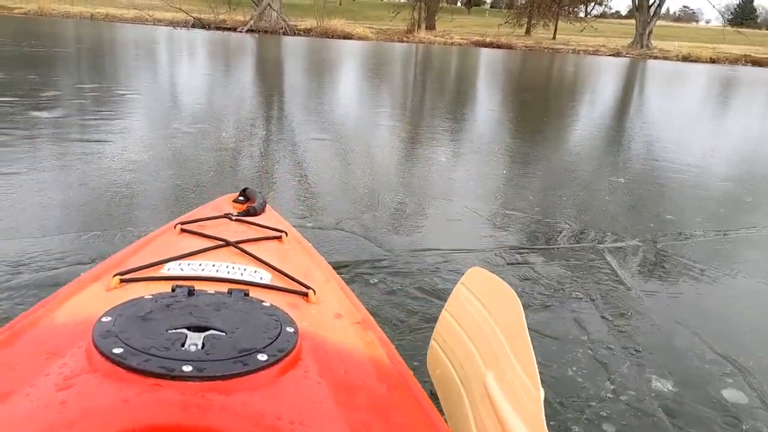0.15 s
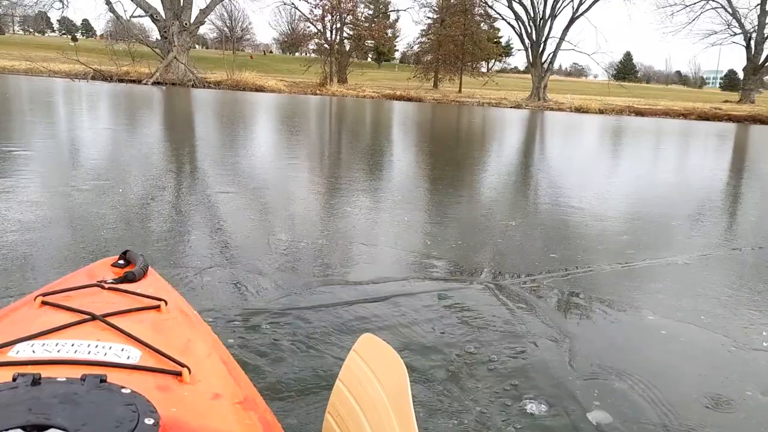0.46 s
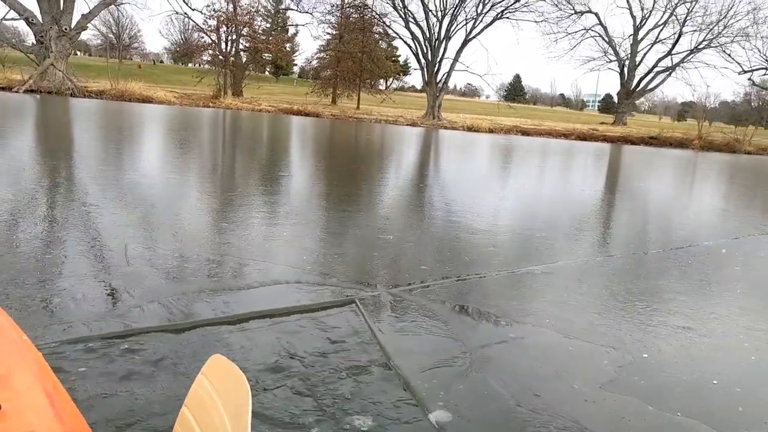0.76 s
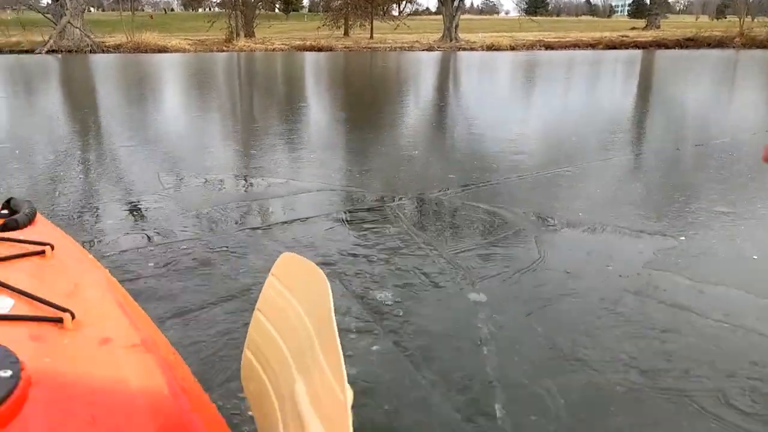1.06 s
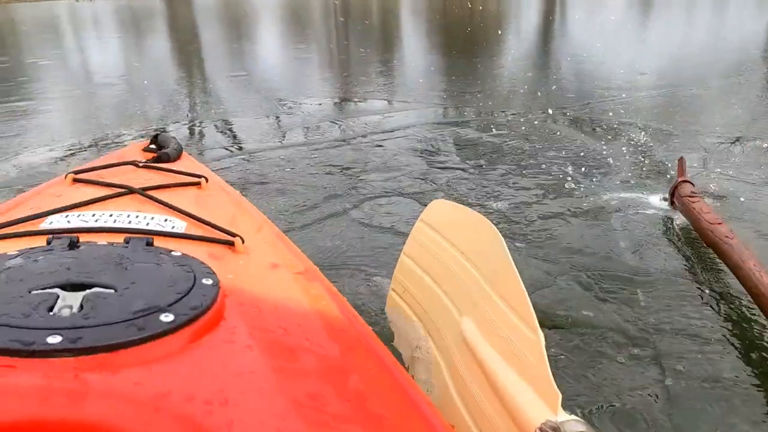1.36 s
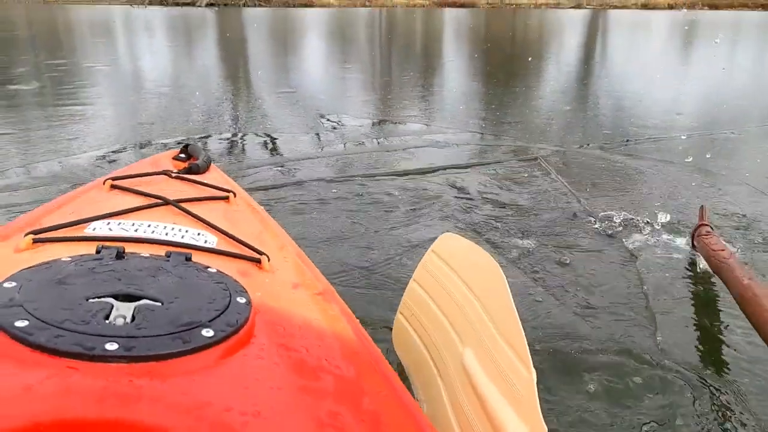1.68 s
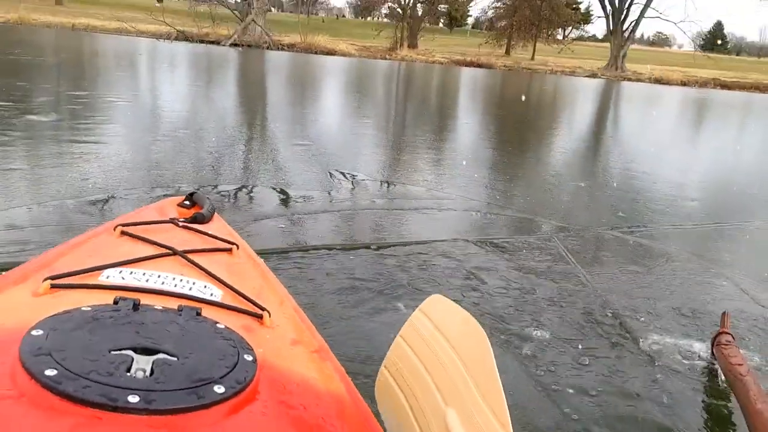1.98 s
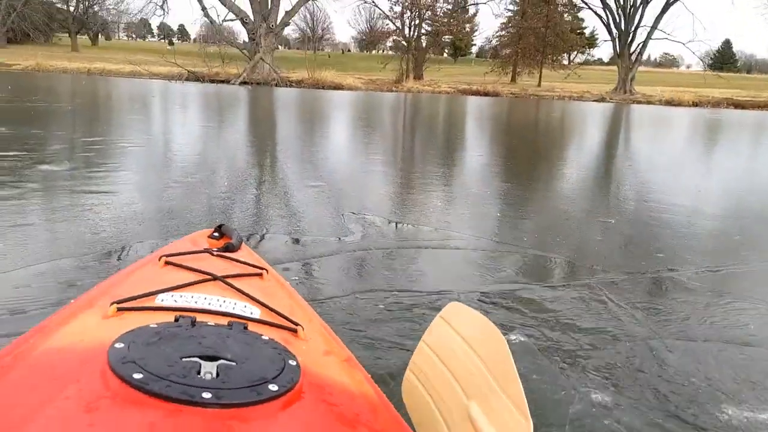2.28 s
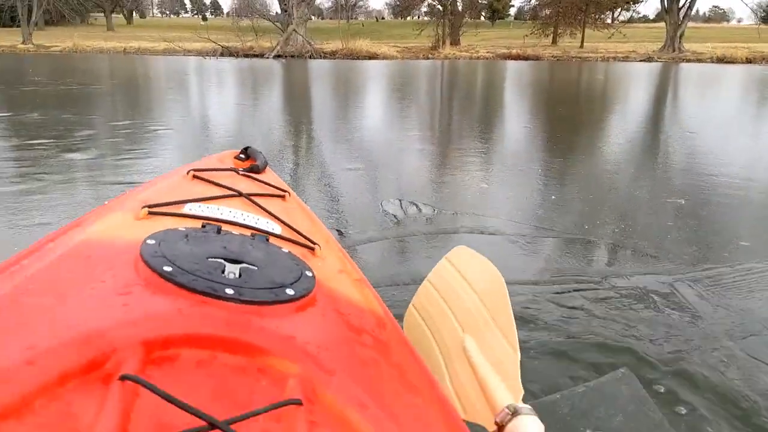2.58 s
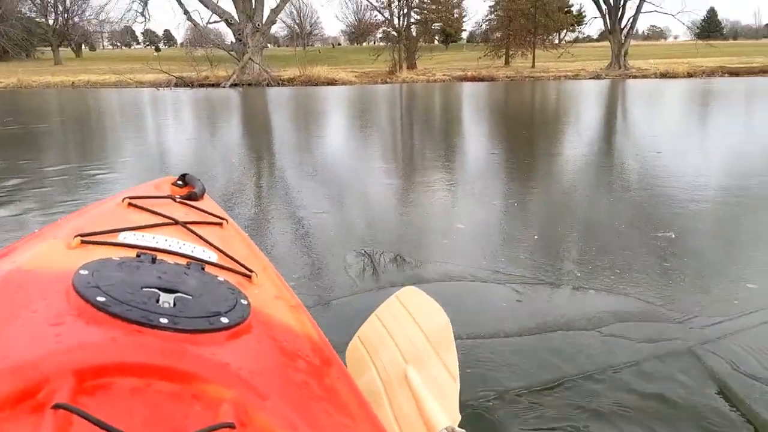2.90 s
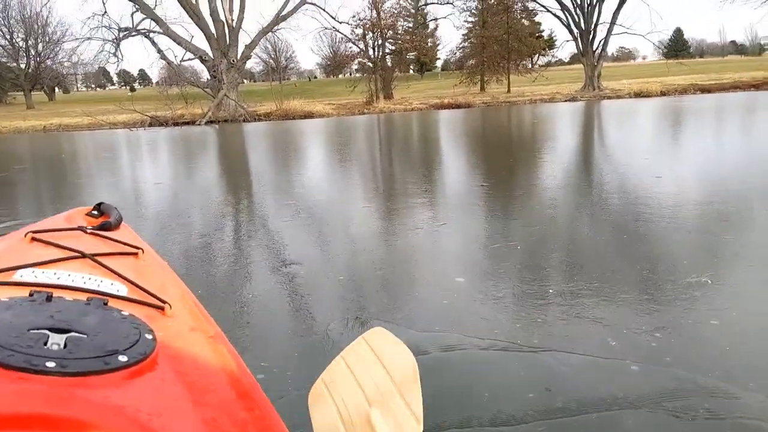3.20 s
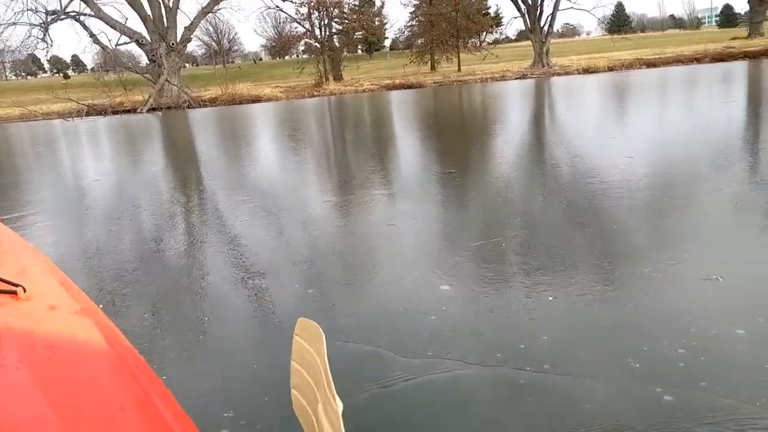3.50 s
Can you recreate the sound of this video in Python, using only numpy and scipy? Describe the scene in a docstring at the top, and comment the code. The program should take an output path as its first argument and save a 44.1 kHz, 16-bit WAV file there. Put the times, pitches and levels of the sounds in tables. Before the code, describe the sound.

Thin ice cracks and grinds against a hollow plastic kayak hull pushing through it.

```python
"""Kayak in thin lake ice

A plastic kayak pushes through the ice, heard from the cockpit. Plates knock and grind on the hollow
hull, and the sheet cracks and crunches at the bow. A pole jabs through with a ping and a small splash.
Trapped air glugs, drops patter, ice edges squeak and loose shards hiss along the sheet.
Behind it all are a soft hiss and light wind rumbling on the microphone."""
import sys
import numpy as np
from scipy import signal
from scipy.fft import rfft, irfft, next_fast_len
from scipy.io import wavfile
from scipy.ndimage import uniform_filter1d

SR = 44100
rng = np.random.default_rng(int(sys.argv[2]) if len(sys.argv) > 2 else 0)


def to_wav(sig):
    """Store sig (one row per channel, or 1-D mono) as 16-bit WAV at the path in sys.argv[1].

    Samples outside -1..1 are clipped; the rate is SR.
    """
    pcm = np.clip(np.atleast_2d(sig), -1, 1) * 32767
    pcm = np.round(pcm).astype(np.int16)
    wavfile.write(sys.argv[1], SR, pcm.T)  # frames by channels


N = 160965
TIME = np.arange(N) / SR  # seconds since the scene began
AGE = TIME[:SR // 2]  # seconds since one short sound began


def amp(db):
    return 10 ** (np.asarray(db) / 20)


def unit(x):
    """Scale a sound to an average power of 1."""
    return x / np.sqrt(np.mean(x ** 2) + 1e-18)


def burst(x, db):
    """Give a short sound as much energy as 20 ms at this level."""
    energy = np.sum(x ** 2) / len(np.atleast_2d(x))
    return x * amp(db) * np.sqrt(SR / 50 / (energy + 1e-18))


def loudness(table, column=1):
    """A volume that glides between a table's levels over time."""
    rows = np.array(table)
    return amp(np.interp(TIME, rows[:, 0], rows[:, column]))


def add(out, start, x):
    i = int(start * SR)
    out[:, i:i + x.shape[-1]] += x[..., :N - i]


def look_up(table, hz):
    rows = np.array(table)
    return np.interp(np.log(hz + 1), np.log(rows[:, 0]), rows[:, 1])


def colour(x, tone, tilt_db=0):
    """Filter a sound by a tone table; a positive tilt makes it brighter."""
    size = 2 * next_fast_len(x.shape[-1] // 2 + 2048)
    hz = np.fft.rfftfreq(size, 1 / SR)
    octaves = np.log2(np.maximum(hz, 500) / 4000)
    gain = amp(look_up(tone, hz) + tilt_db * octaves)
    # These steps keep the filter from ringing before a hit.
    cepstrum = irfft(np.log(gain))
    cepstrum[1:size // 2] *= 2
    cepstrum[size // 2 + 1:] = 0
    return irfft(rfft(x, size) * np.exp(rfft(cepstrum)))[..., :x.shape[-1]]


def band(x, hz, width):
    """Keep the sound around one pitch; width is a multiple of that pitch."""
    edge = width / 2 + np.sqrt(1 + width ** 2 / 4)
    limits = [hz / edge, min(hz * edge, SR / 2.2)]
    return signal.sosfilt(signal.butter(1, limits, "band", fs=SR, output="sos"), x + 1e-18)


def clicks(size, per_s, spread_db):
    """Tiny random impacts of uneven strength."""
    happens = rng.random(size) < per_s / SR
    strength = amp(spread_db * np.clip(rng.standard_normal(size), -2, 2))
    return happens * rng.choice([-1, 1], size) * strength


def die_away(seconds):
    """A fade that drops 60 dB in this time."""
    return np.exp(-np.log(1000) * AGE / seconds)


def ring(notes):
    """The fading notes of a struck object, added together."""
    return sum((-1) ** k * amp(db) * np.sin(2 * np.pi * hz * AGE) * die_away(seconds)
               for k, (hz, db, seconds) in enumerate(notes))


def wash(fade_s, apart_hz=1060):
    """Fading noise, alike on both sides in the bass. A fade time is the time to fall to 37%."""
    shared, side = rng.standard_normal((2, len(AGE)))
    side = signal.sosfilt(signal.butter(2, apart_hz, "high", fs=SR, output="sos"), side)
    x = (shared + side * np.array([[1], [-1]])) * np.exp(-AGE / fade_s)
    return x / np.sqrt(np.sum(x ** 2) / 2)


def through(x, response):
    """Let every part of a sound set off the given ring."""
    return signal.fftconvolve(np.atleast_2d(x), response, axes=1)[:, :x.shape[-1]]


# How the background hiss swells and dips. Each row: time in seconds, level in dB.
HISS_LEVELS = [(0, -44.5), (.25, -45), (.5, -39), (.7, -48.5), (.85, -47.5), (1.0, -40.5), (1.18, -39.5),
               (1.31, -51.5), (1.42, -38), (1.6, -51), (1.9, -41.5), (2.3, -43), (3.0, -42.5), (3.65, -50)]
# The tone of the hiss and of the wind. Each row: frequency in Hz, boost in dB.
HISS_TONE = [(200, 21.5), (600, 16), (1300, 6.5), (2300, 4.5), (4000, 1.5), (5500, 4), (8500, 5),
             (11000, -3.5), (13500, 5), (16000, -14)]
WIND_TONE = [(20, -37), (60, -1), (160, -5), (400, -22), (1500, -48)]


def air():
    """A soft hiss comes and goes while wind rumbles on the microphone."""
    hiss = unit(colour(rng.standard_normal((2, N)), HISS_TONE))
    wind = unit(colour(rng.standard_normal((2, N)), WIND_TONE))
    return hiss * loudness(HISS_LEVELS) + wind * amp(-42)


# Sliding shards growing louder. Each row: time in seconds, level in dB.
SHARD_LEVELS = [(0, -64.5), (2.5, -50.5), (2.9, -40.5), (3.1, -35.5), (3.35, -33), (3.65, -29.5)]
# Their tone. Each row: frequency in Hz, boost in dB.
SHARD_TONE = [(300, -21), (700, 3.5), (1300, 2.5), (2100, 0), (2900, -2), (3300, -15), (6000, -15),
              (8800, -11), (11000, -19.5), (16000, -18.5)]


def shards():
    """Countless small pieces slide and tinkle over the sheet."""
    tinkles = np.array([clicks(N, per_s=3500, spread_db=7.5) for _ in range(2)])
    return unit(colour(tinkles, SHARD_TONE)) * loudness(SHARD_LEVELS)


# Falling water. Each row: start in seconds, level in dB, pitch in Hz, fade time in seconds.
WATER_DROPS = [(1.408, -43, 2040, 0.015), (1.444, -45.5, 5800, 0.0028), (1.467, -44, 5870, 0.0055),
               (1.487, -40, 2330, 0.018), (1.495, -48, 5260, 0.0086), (1.549, -49, 2480, .014),
               (1.75, -47, 8200, 0.017), (1.803, -42, 1760, 0.0093), (1.885, -47, 2400, 0.0086)]


def drops():
    """Drops patter back onto the ice around the pole's hole."""
    out = np.zeros((2, N))
    for start, db, hz, fade_s in WATER_DROPS:
        taps = clicks(len(AGE), per_s=1400, spread_db=1) * np.exp(-AGE / fade_s)
        patter = band(through(taps, wash(fade_s=0.0019)), hz, width=0.2)
        add(out, start, burst(band(patter, hz, width=0.97), db))
    return out


# Ice edges rubbing. Each row: start in seconds, level in dB, length in seconds.
EDGE_SQUEAKS = [(2.419, -29, 0.064), (3.322, -32.5, 0.1)]


def squeaks(hz=8700):
    """Fast slips of one ice edge on another ring a thin, high note."""
    out = np.zeros((2, N))
    for start, db, length in EDGE_SQUEAKS:
        slips = np.array([clicks(len(AGE), per_s=4000, spread_db=1) for _ in range(2)])
        swell = np.sin(np.pi * np.minimum(AGE / length, 1))
        note = band(slips * swell, hz, width=0.07)
        add(out, start, burst(band(note, hz, width=0.14), db))
    return out


# Air under the ice. Each row: start in seconds, level in dB, pitch in Hz, seconds to die away.
AIR_POCKETS = [(.747, -30.5, 562, 0.04), (0.748, -21.5, 275, 0.12), (0.921, -42.5, 1164, 0.02),
               (1.092, -36, 810, 0.049), (1.15, -28, 915, 0.023), (1.174, -14.5, 198, 0.21),
               (1.258, -20, 191, 0.14), (1.674, -33, 1504, 0.079), (1.936, -26, 650, 0.051),
               (1.994, -10, 222.3, 0.117), (1.995, -25.5, 645, 0.095), (1.997, -17, 436.6, 0.11),
               (2.305, -21.5, 396.5, 0.17), (2.409, -21.5, 660, 0.21), (2.68, -10.5, 161, 0.29),
               (3.392, -19, 239.5, 0.13), (3.424, -15.5, 180, 0.12)]


def glugs(pitch_rise=0.016, onset_s=0.005):
    """Each pocket of trapped air rings with a slight rise in pitch."""
    out = np.zeros((2, N))
    onset = 1 - np.exp(-AGE / onset_s)
    for start, db, hz, seconds in AIR_POCKETS:
        pitch = hz * (1 + pitch_rise * np.minimum(AGE / seconds, 1))
        note = np.sin(2 * np.pi * np.cumsum(pitch) / SR)
        add(out, start, burst(note * onset * die_away(seconds), db))
    return out


# The notes in the pole's ping. Each row: pitch in Hz, relative level in dB, seconds to die away.
POLE_NOTES = [(1960, 2, 0.012), (2180, 4, .014), (3670, -9, 0.018), (6520, -9, 0.0096)]


def pole(jab_at_s=1.3405, splash_at_s=1.346, push_s=0.0014):
    """The pole pings on the ice and water slaps up through the hole."""
    out = np.zeros((2, N))
    ping = ring(POLE_NOTES) * (1 - np.exp(-(AGE / push_s) ** 2))
    tail = through(ping, wash(fade_s=0.011))
    add(out, jab_at_s, burst(ping, db=-15.5) + burst(tail, db=-25.5))
    splash = band(wash(fade_s=0.034), hz=857, width=0.34)
    add(out, splash_at_s, burst(splash, db=-23.5))
    return out


# Cracks running through the sheet. Each row: peak time in seconds, level in dB, rise time in seconds,
# fade time in seconds, brightness tilt in dB per octave, how much louder the left is in dB.
SHEET_CRACKS = [(.341, -36.5, .006, 0.017, -7, 2), (.418, -44, 0.0024, .003, -1, 5),
                (.512, -41, 0.00091, 0.02, -3, 4), (0.632, -45.5, 0.0013, 0.0027, 4, 0),
                (.718, -48, 0.0023, 0.0066, -2.5, 1), (0.746, -45.5, .001, 0.0034, -5.5, -2),
                (1.145, -36, 0.0019, 0.005, -9.5, 0), (1.342, -23.5, 0.0014, 0.0017, -1.5, -10.5),
                (1.353, -20.5, 0.003, 0.0052, 0.5, -4.5), (1.649, -34.5, 0.0019, 0.012, 0.5, -8),
                (1.93, -40, 0.0024, 0.005, 0, 4), (1.983, -24.5, 0.0014, 0.0033, -4.5, 1),
                (1.9932, -27.5, 0.00069, 0.0035, -2, 1), (2.033, -35, 0.0015, 0.0015, -2, 0),
                (2.073, -31, .002, 0.015, 3.5, 3), (2.085, -36, 0.0019, 0.0019, -3.5, -7),
                (2.137, -37.5, .001, 0.0022, 2, 1), (2.157, -37.5, 0.0012, 0.0022, 6, 10),
                (2.18, -47, 0.0008, .002, 16, -17), (2.3024, -21.5, 0.0011, 0.0021, 1, -1.5),
                (2.324, -23, 0.0076, .008, -2, -4.5), (2.408, -26.5, 0.0054, .01, 1.5, 1),
                (2.453, -19, .035, 0.018, -1.5, -2), (2.514, -32.5, 0.0028, 0.0044, -3.5, -2),
                (2.612, -46, 0.00097, 0.0017, -2.5, 2), (2.672, -30, 0.0026, 0.0043, 2.5, -5),
                (2.725, -31, 0.0047, 0.0085, -3, 3), (2.743, -34.5, .003, 0.011, 5, -5),
                (2.778, -40.5, 0.0019, .004, 2, -6), (2.936, -43.5, 0.0022, 0.0035, 6, -7),
                (2.9767, -45, .001, .002, 7, -4), (3.1212, -28, 0.0013, 0.0036, 0, -1.5),
                (3.135, -19.5, 0.0044, 0.018, 0, 4), (3.227, -32.5, 0.0017, .008, -3, 0),
                (3.261, -20.5, 0.0076, 0.015, -1, 3), (3.295, -26, .002, 0.0061, -2.5, 7),
                (3.308, -23.5, 0.011, 0.013, 1, 1.5), (3.376, -30, 0.0033, 0.0089, -0.5, -1.5),
                (3.43, -30.5, 0.013, 0.0079, 0, 5), (3.445, -29, 0.0013, 0.0014, -2, -4),
                (3.551, -34, 0.0017, 0.0022, -2, 2)]
# The tone of breaking ice. Each row: frequency in Hz, boost in dB.
CRACK_TONE = [(150, -23), (600, 8), (1300, 8.5), (2200, 7.5), (3300, 1.5), (5000, -0.5), (7000, 2.5),
              (9000, 1), (11000, -8), (14000, -2.5), (16000, -15)]


def cracks():
    """A crack is one snap in a swarm of tiny breaks, with a short ring in the sheet."""
    out = np.zeros((2, N))
    for peak, db, rise_s, fade_s, tilt_db, left_db in SHEET_CRACKS:
        lead_s = 3 * rise_s
        swell = np.exp(np.minimum((AGE - lead_s) / rise_s, (lead_s - AGE) / fade_s))
        swarm = burst(clicks(len(AGE), per_s=1500, spread_db=4.5) * swell, db=0)
        snap = burst(1. * (swell == swell.max()), db=-10)
        breaks = through(swarm + snap, wash(fade_s=0.00046))
        crumbs = burst(rng.standard_normal((2, len(AGE))) * swell, db=-5.5)
        crunch = breaks + crumbs
        tail = amp(-12) * through(crunch, wash(fade_s=0.016))
        crack = burst(colour(crunch + tail, CRACK_TONE, tilt_db), db)
        balance = amp(np.array([[left_db], [-left_db]]) / 2)
        add(out, peak - lead_s, crack * balance)
    return out


# The hull's own notes. Each row: pitch in Hz, relative level in dB, seconds to die away.
HULL_NOTES = [(61, -25, .16), (89, -8, 0.04), (118, -37, 0.037), (156.4, 1, .15), (203.2, 4, .11),
              (250.2, 0, 0.099), (295.5, -1, .09), (339, -0.5, 0.084), (425.8, -2.5, 0.095),
              (532, -6, 0.08), (651, -6.5, 0.045), (892.6, -4.5, 0.037), (1104, 1.5, 0.03),
              (1283, -2.5, 0.092)]


def hull():
    """The hollow shell answers a tap with its notes and a short blur of noise."""
    blur = band(wash(fade_s=0.019), hz=750, width=1.32)
    return unit(ring(HULL_NOTES)) + amp(-4) * unit(blur)


# Ice pressing on the hull. Each row: time in seconds, boom level in dB, grinding level in dB.
ICE_PRESSURE = [(0, -18.5, -43.5), (.08, -16.5, -28), (.19, -28, -33), (.35, -24, -25), (.47, -30.5, -32),
                (.59, -21.5, -32.5), (.71, -31, -36), (.93, -39, -43.5), (1.12, -29, -35.5),
                (1.18, -12.5, -28.5), (1.32, -27, -32.5), (1.48, -26, -34), (1.62, -33.5, -35),
                (1.92, -35.5, -36.5), (1.97, -14.5, -13), (2.06, -14.5, -22), (2.18, -20, -18.5),
                (2.25, -23.5, -26.5), (2.32, -14, -18.5), (2.38, -17, -20.5), (2.46, -11, -14),
                (2.58, -11.5, -19), (2.73, -12.5, -15.5), (2.89, -19.5, -24.5), (3.1, -25.5, -28.5),
                (3.19, -13, -19.5), (3.3, -16, -16.5), (3.46, -21, -21.5), (3.6, -28, -36.5),
                (3.65, -29, -32)]
# The tone of the low boom, the grinding and the fine grit. Each row: frequency in Hz, boost in dB.
BOOM_TONE = [(20, 8), (32, -23), (48, -13), (62, 2), (100, 3.5), (135, -3.5), (200, -12.5), (400, -63)]
GRIND_TONE = [(50, -31), (110, -7.5), (160, 1.5), (230, -3.5), (320, -5.5), (500, -11.5), (900, -13.5),
              (1500, -20), (3000, -19.5), (8000, -34.5)]
GRIT_TONE = [(400, -10), (1200, 2), (2200, 2), (4000, -4), (8500, -4), (11000, -13), (14000, -11),
             (16000, -15)]


def grinding(slips_per_s=330):
    """Ice sticks and slips along the hull, which booms as it flexes; grit breaks off the edges."""
    boom = colour(clicks(N, slips_per_s, spread_db=-0.5), BOOM_TONE)
    boom_power = uniform_filter1d(boom ** 2, size=SR // 12)
    boom = unit(boom / np.sqrt(boom_power + 1e-12))  # even out the random swells
    slips = clicks(N, slips_per_s, spread_db=-0.5)
    grind = unit(colour(through(slips, hull()), GRIND_TONE))
    chips = clicks(N, per_s=200, spread_db=4.5)
    grit = unit(colour(through(chips, wash(fade_s=0.0027)), GRIT_TONE))
    force = loudness(ICE_PRESSURE, column=2)
    grit_volume = amp(-33.5) * force ** 0.57  # follows the grinding, with smaller swings
    return boom * loudness(ICE_PRESSURE) + grind * force + grit * grit_volume


# Ice hitting the hull. Each row: start in seconds, level in dB, pitch in Hz, rattle fade in seconds.
PLATE_KNOCKS = [(.002, -22.5, 170, 0.041), (0.329, -25.5, 246, 0.039), (.509, -28.5, 415, 0.013),
                (0.633, -31.5, 320, 0.0044), (0.743, -31, 390, 0.005), (1.0, -36, 1150, 0.008),
                (1.092, -36, 920, 0.0033), (1.146, -29, 790, 0.011), (1.162, -13.5, 125, 0.038),
                (1.243, -24.5, 195, 0.022), (1.342, -22, 231, 0.0042), (1.545, -29, 225, 0.004),
                (1.668, -22.5, 185, 0.03), (1.933, -17.5, 380, 0.015), (1.993, -11, 315, 0.011),
                (2.083, -20.5, 1030, 0.0022), (2.093, -16, 295, 0.0088), (2.17, -31, 216, .015),
                (2.252, -22.5, 327, 0.015), (2.303, -18, 362, .008), (2.328, -16.5, 345, 0.0022),
                (2.408, -13.5, 490, 0.021), (2.441, -23, 200, 0.028), (2.531, -20.5, 290, 0.004),
                (2.67, -21, 200, 0.014), (2.775, -13, 110, .003), (2.929, -28, 380, 0.013),
                (3.022, -24, 300, 0.0037), (3.124, -13.5, 344, 0.038), (3.304, -17, 585, 0.065),
                (3.391, -14.5, 290, 0.017), (3.423, -14, 202, 0.016), (3.626, -24.5, 580, 0.032)]


def knocks():
    """Each plate of ice strikes the hull once and rattles, at its own pitch."""
    out = np.zeros((2, N))
    strike = burst(1. * (AGE == 0), db=0)
    for start, db, hz, fade_s in PLATE_KNOCKS:
        rattle = clicks(len(AGE), per_s=810, spread_db=1.5) * np.exp(-AGE / fade_s)
        push = strike + burst(rattle, db=-0.5)
        knock = band(through(push, hull()), hz, width=0.93)
        add(out, start, burst(band(knock, hz, width=5.0), db))
    return out


def scene():
    """Ice, pole, water and air sound together."""
    return knocks() + grinding() + cracks() + squeaks() + pole() + glugs() + drops() + shards() + air()


# The microphone's two sides differ in tone. Each row: frequency in Hz, left minus right in dB.
LEFT_BOOST = [(100, 0), (700, -1), (1300, 0.5), (2400, 1.5), (4400, 2.5), (8100, 5), (10500, 4.5),
              (12500, -5.5), (15500, -26)]
# The left side hears a little late. Each row: frequency in Hz, delay in seconds.
LEFT_DELAY = [(100, 0.00014), (700, 0.00016), (1600, 0.00039), (12000, 0.000357)]


def record(dry, low_cut_hz=27, top_hz=16000):
    """The microphone colours each side, cuts the deepest bass, clips big peaks and cuts the very top."""
    hz = np.fft.rfftfreq(N, 1 / SR)
    lean = amp(look_up(LEFT_BOOST, hz) / 2)
    delay = np.exp(-2j * np.pi * hz * look_up(LEFT_DELAY, hz))
    x = irfft(rfft(dry) * np.array([lean * delay, 1 / lean]), N)
    x = signal.sosfilt(signal.butter(3, low_cut_hz, "high", fs=SR, output="sos"), x)
    x = np.clip(x, -1, 1)
    return signal.sosfilt(signal.ellip(10, .2, 80, top_hz, fs=SR, output="sos"), x)


dry = scene()
out = record(dry)
to_wav(out)
```